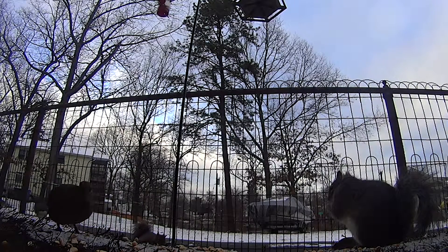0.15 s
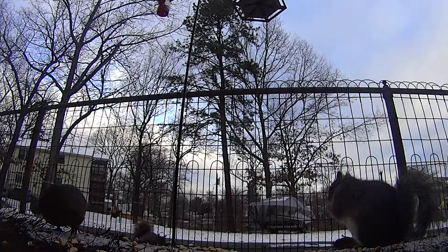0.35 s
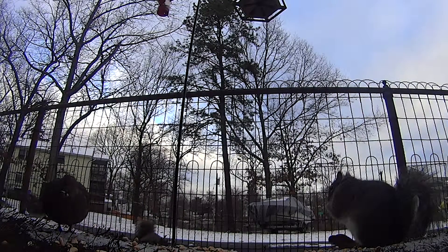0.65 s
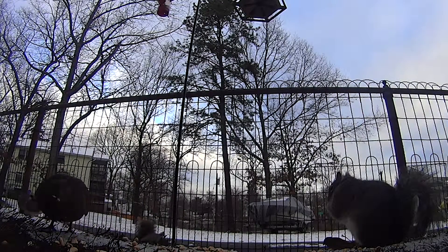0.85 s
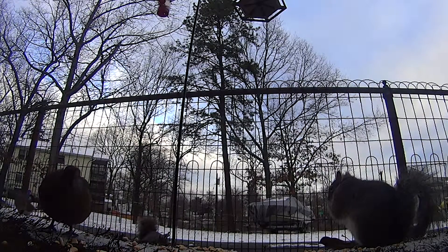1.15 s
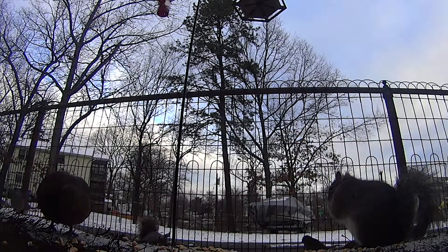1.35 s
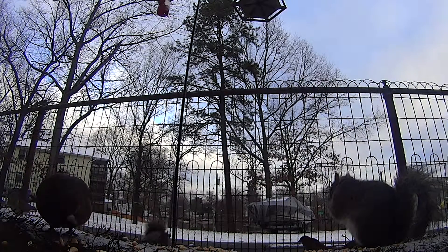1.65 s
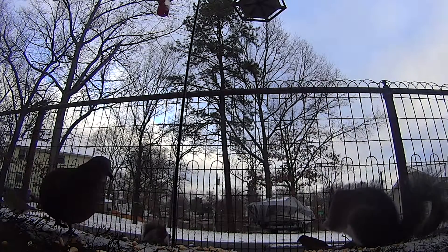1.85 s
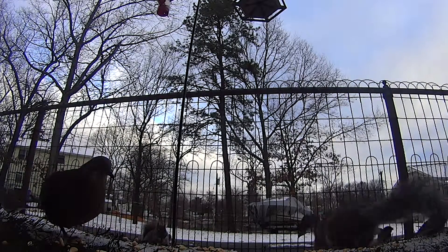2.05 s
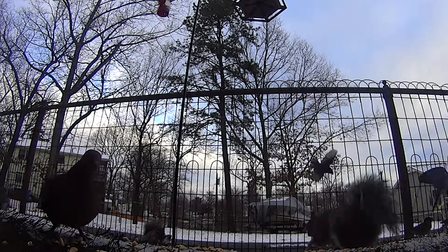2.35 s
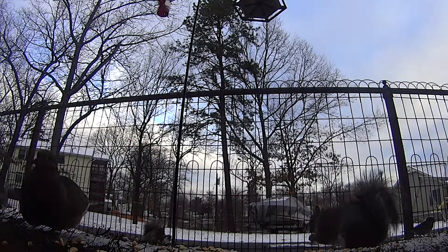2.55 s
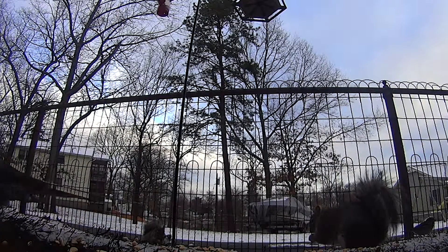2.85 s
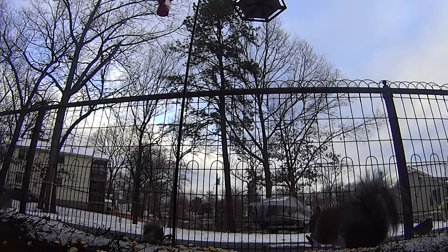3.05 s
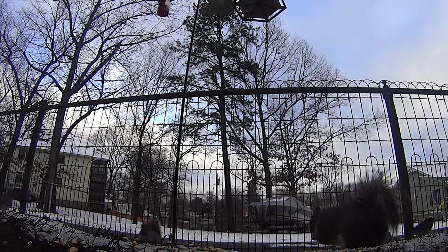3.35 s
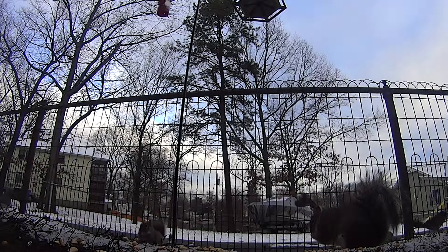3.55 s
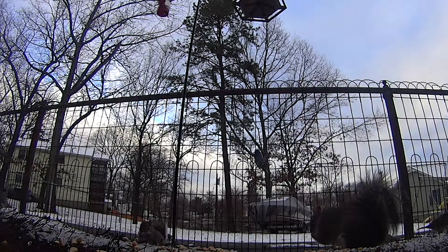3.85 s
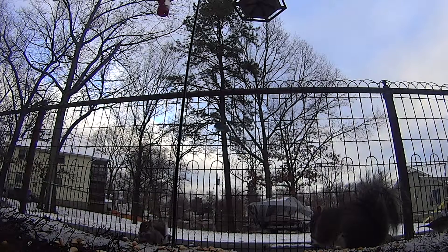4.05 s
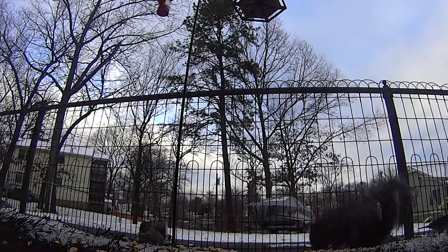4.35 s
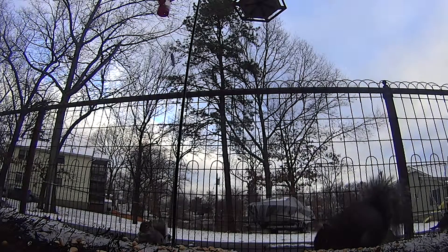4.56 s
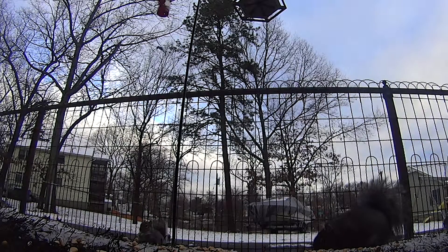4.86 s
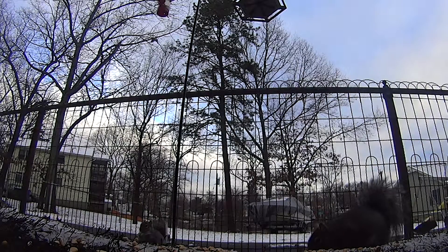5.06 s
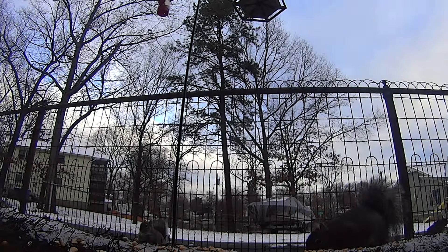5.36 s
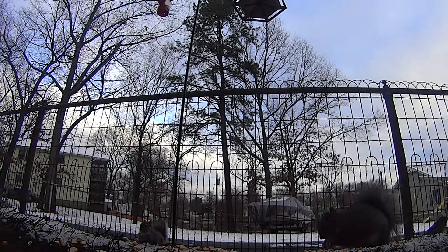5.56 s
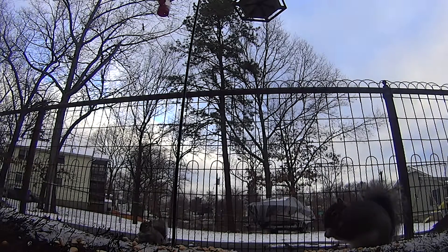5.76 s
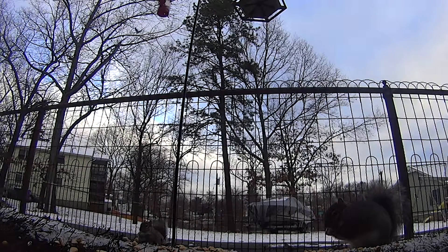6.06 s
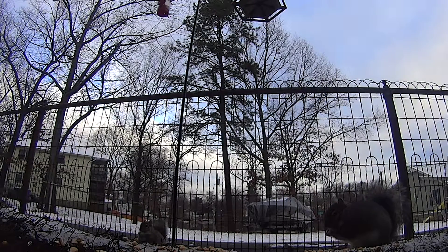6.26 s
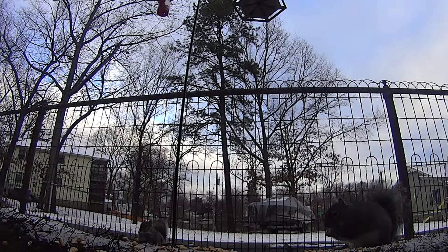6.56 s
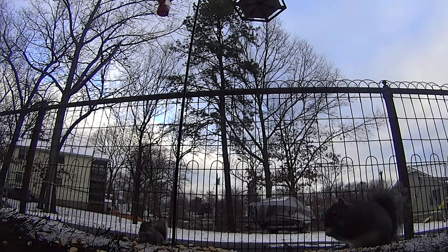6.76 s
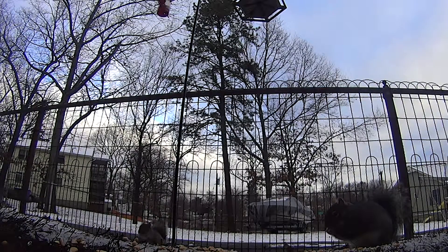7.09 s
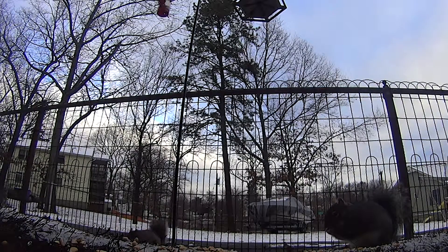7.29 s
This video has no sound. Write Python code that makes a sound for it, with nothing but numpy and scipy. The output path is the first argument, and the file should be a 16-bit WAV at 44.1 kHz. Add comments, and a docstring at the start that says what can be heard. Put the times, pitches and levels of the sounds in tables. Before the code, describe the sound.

A squirrel feeds in scattered husks right beside a small camera in a quiet yard. Dry clicks and light paw patter come first, then dull steps on the hollow platform and doves taking off with quick, airy, squeaky wing whistles. A violent rattling bump on the plastic housing peaks near four seconds, followed by receding wingbeats, calm nibbling and occasional soft taps over steady wide hiss.

```python
"""A feeding platform outdoors: a small camera stands in scattered seed while a squirrel forages around it.
Under everything lie faint air, wide hiss and a thin whine; random pushes ring the housing as husk ticks and scrapes.
Feet sound the platform's low modes, and sharp knocks ring the housing's upper modes with a short rattle.
Doves fly off: each wingbeat is a short whistle with an arched pitch and a diffuse echo."""
import sys
import numpy as np
from scipy import signal
from scipy.fft import rfft, irfft
from scipy.io import wavfile
from scipy.ndimage import uniform_filter1d

SR = 44100
rng = np.random.default_rng(int(sys.argv[2]) if len(sys.argv) > 2 else 0)


def digitize_waveform(pressure):
    """Quantize a signal to 16-bit integers and store it at the path in sys.argv[1].

    Rows of a 2-D input are taken as channels; values are limited to [-1, 1].
    """
    field = np.atleast_2d(pressure).T
    bounded = np.clip(field, -1, 1)
    quanta = np.round(bounded * 32767).astype(np.int16)
    wavfile.write(sys.argv[1], SR, quanta)


N = 327507


def undb(db):
    """Decibels to gain."""
    return 10 ** (np.asarray(db) / 20)


def level(x, db):
    """Scale to an rms level."""
    return x * undb(db) / np.sqrt(np.mean(x ** 2) + 1e-24)


def add(out, start_s, x):
    """Mix a stereo or mono sound in at a time."""
    i = max(int(start_s * SR), 0)
    out[:, i:i + x.shape[-1]] += x[..., :max(N - i, 0)]


def shaped_noise(points):
    """Steady noise whose spectrum follows (pitch_hz, level_db) points."""
    hz, db = np.transpose(points)
    f = np.maximum(np.fft.rfftfreq(N, 1 / SR), 1)
    gain = undb(np.interp(np.log(f), np.log(hz), db))
    return irfft(rfft(rng.standard_normal(N)) * gain, N)


def resonance(f, hz, width_hz):
    """Complex response of one resonance, 1 at its centre."""
    return 1j * f * width_hz / (hz ** 2 - f ** 2 + 1j * f * width_hz)


def band(hz, width_hz):
    """Noise passed twice through one resonance."""
    f = np.fft.rfftfreq(N, 1 / SR)
    return irfft(rfft(rng.standard_normal(N)) * resonance(f, hz, width_hz) ** 2, N)


def drift(steps_per_s, step_db):
    """Gain that wanders smoothly: random steps in dB, averaged over one step's length."""
    k = int(SR / steps_per_s)
    steps = np.repeat(rng.standard_normal(N // k + 1), k)
    return undb(step_db * uniform_filter1d(steps, k)[:N])


def burst(t60_s):
    """Stereo noise that dies away, scaled to unit energy in the left port."""
    t = np.arange(int(t60_s * SR)) / SR
    x = rng.standard_normal((2, len(t))) * np.exp(-np.log(1000) * t / t60_s)
    return x / np.sqrt(np.sum(x[0] ** 2))


def ring(modes, treble_db=0, length=1, pitch=1):
    """Stereo response of a body to one blow: decaying modes, with treble_db tilting the upper ones."""
    hz, db, t60_s, lead_rad = np.transpose(modes)[:, :, None]
    t = np.arange(int(t60_s.max() * length * SR)) / SR
    upper = np.clip(np.log2(hz / 1800), 0, .5) * 2  # 0 up to 1800 Hz, 1 from half an octave above
    decay = undb(db + treble_db * upper) * np.exp(-np.log(1000) * t / (t60_s * length))
    polarity = (-1) ** np.arange(len(modes))[:, None]  # neighbouring modes swing against each other
    swing = 2 * np.pi * hz * pitch * t
    ports = [np.sum(polarity * decay * np.cos(swing + side * lead_rad), axis=0) for side in (.5, -.5)]
    return np.array(ports)


def grains(size, per_s, spread_db):
    """Sparse random pushes of uneven strength and either sign."""
    chance, strength = rng.random(size), rng.standard_normal(size)
    sign = rng.choice([-1, 1], size)
    return (chance < per_s / SR) * sign * undb(spread_db * np.clip(strength, -2, 2))


def excite(pushes, response):
    """Play a train of pushes through a stereo response."""
    return signal.fftconvolve(pushes[None], response, axes=1)


# Spectrum of the air, alike in both ports: pitch_hz [Hz], level_db [relative dB per Hz]
AIR_SPECTRUM = [(15, -53.5), (25, -16), (48, 1.5), (81, -4), (107, 0), (156, -1), (223, -3), (296, -3.5),
                (327, -6.5), (480, -9), (1170, -13), (1630, -12.5), (2450, -15.5), (6780, -17.5),
                (11000, -19.5), (14300, -107), (22000, -120)]
# Spectrum of the hiss, opposed between the ports: pitch_hz [Hz], level_db [relative dB per Hz]
HISS_SPECTRUM = [(15, -51.5), (25, -20), (92, -16.5), (192, -9), (296, -1.5), (327, -16), (372, 0.5),
                 (412, -8), (635, -4.5), (1430, -8.5), (5820, -19), (6610, -21), (11000, -27), (14300, -75),
                 (22000, -120)]


def background(air_db=-60.5, hollow_db=-72, hiss_db=-59, whine_db=-82):
    """Outdoor air hums in the housing; the close ports add wide hiss and a thin electronic whine."""
    air = level(shaped_noise(AIR_SPECTRUM), air_db) * drift(4.07, step_db=.168)
    hollow = level(band(1607, 300), hollow_db) * drift(5.3, step_db=.1656)
    hiss = level(shaped_noise(HISS_SPECTRUM), hiss_db)
    whine = np.array([level(band(6750, 110), whine_db) for port in range(2)])
    return air + hollow + hiss * np.array([[1], [-1]]) + whine


# Modes of the platform: pitch_hz [Hz], level_db [dB], t60_s [s], left_lead_rad [rad]
PLATFORM_MODES = [(124, -18, 0.13, -0.37), (205, -17.5, 0.1416, -1.04), (313, 6, 0.057, -2),
                  (424, 2.5, 0.0091, -2.5), (610, -14, 0.03, -4.5), (641.2, -1, 0.037, -2.5)]


def footfall(pitch, contact_s=0.0014, softening=4, length=1.55, linger=1.83):
    """A smooth push on the platform: softer, lower-pitched steps push for longer and ring on."""
    push = signal.windows.hann(max(int(SR * contact_s / pitch ** softening), 5))
    return excite(push / push.sum(), ring(PLATFORM_MODES, length=length / pitch ** linger, pitch=pitch))


# Modes of the camera housing: pitch_hz [Hz], level_db [dB], t60_s [s], left_lead_rad [rad]
HOUSING_MODES = [(1572, 6, 0.015, 1.65), (1685, 7, 0.015, 1.81), (2620, -7, 0.0093, 2),
                 (2990, -11.5, 0.016, 4), (3650, -6.5, 0.01, 2.5), (4200, -4, 0.018, 3.5),
                 (4900, -11.5, 0.023, 2), (5220, -5, 0.0058, 4.5), (5470, -14, 0.0035, 2.5),
                 (5915, -6, 0.0057, -0.5), (7230, -16.5, 0.014, 1), (8880, -18.5, 0.0099, 2),
                 (9550, -21.5, 0.0068, -1), (10750, -28, 0.0045, 3.5)]
# How busy the animals are in the seed: time_s [s], swell_db [dB above calm feeding]
BUSTLE_CURVE = [(0, -0.5), (1.95, -2), (2.2, 11.5), (2.6, 10.5), (3.1, 0), (3.65, 3.5), (4.05, 18.5),
                (4.3, 8), (4.48, 8.5), (4.75, 1.5), (6.1, -2), (6.45, 5), (6.9, -7)]


def foraging(tick_db=-71, patter_db=-70, rustle_db=-73, tick_share=0.76, patter_share=0.62):
    """Nibbling ticks, shifting paws and rustling husks: random pushes that swell with the bustle."""
    bustle_db = np.interp(np.arange(N) / SR, *np.transpose(BUSTLE_CURVE))
    nibbles = grains(N, per_s=30, spread_db=5)
    paws = grains(N, per_s=20, spread_db=4)
    husks = grains(N, per_s=900, spread_db=6.5)
    ticks = excite(nibbles, ring(HOUSING_MODES, treble_db=-18))[:, :N]
    patter = excite(paws, footfall(pitch=.92))[:, :N]
    rustle = excite(husks, ring(HOUSING_MODES, treble_db=-5, length=0.39))[:, :N]
    # levels are set at calm; ticks and patter follow only a share of the swell
    ticks = level(ticks, tick_db) * undb(tick_share * bustle_db)
    patter = level(patter, patter_db) * undb(patter_share * bustle_db)
    return ticks + patter + level(rustle, rustle_db) * undb(bustle_db)


# Claws and feathers dragged through seed: start_s [s], length_s [s], level_db [dB rms], treble_db [dB]
SCRAPE_EVENTS = [(2.097, 0.1044, -56, -10.5), (2.733, 0.069, -63.5, -5), (3.2, 0.0152, -51, 0),
                 (3.235, 0.04, -44.5, -3.5), (3.27, 0.014, -51, -12), (3.76, 0.14, -62, -9),
                 (3.929, 0.014, -44, -11), (3.936, 0.023, -35.5, -0.5), (3.97, 0.028, -38, -9.5),
                 (3.99, 0.051, -50.5, -3), (4.387, 0.11, -63.5, 0)]


def scrapes(per_s=2500, spread_db=6, length=0.31):
    """Dense catches of claw and husk ring the housing."""
    out = np.zeros((2, N))
    for start_s, length_s, level_db, treble_db in SCRAPE_EVENTS:
        size = int(length_s * SR)
        catches = grains(size, per_s, spread_db) * signal.windows.tukey(size, .5)
        add(out, start_s, level(excite(catches, ring(HOUSING_MODES, treble_db, length)), level_db))
    return out


# Bursts of flapping: first_stroke_s [s], last_stroke_s [s], strokes [count], stroke_length_s [s],
# first_pitch_hz [Hz], last_pitch_hz [Hz], first_level_db [dB], last_level_db [dB],
# fall [share of the pitch lost by the end of a stroke]
FLAP_BURSTS = [(2.184, 2.356, 3, 0.027, 2129, 2140, -57, -52, 0.388),
               (2.651, 2.851, 3, 0.029, 2160, 2006, -57, -61, .15),
               (3.218, 3.322, 2, 0.03, 1840, 1750, -54, -43.5, 0.11),
               (3.37, 3.891, 8, .033, 2260, 2400, -68.5, -64.5, 0.11),
               (3.502, 3.605, 2, .024, 1707, 1733, -55, -52.5, 0.12),
               (3.686, 3.854, 3, .035, 1850, 1910, -53, -58.5, 0.16),
               (4.049, 4.21, 3, 0.041, 2440, 2410, -58.5, -60, .33),
               (4.298, 4.67, 5, .042, 2305, 2317, -61, -61.5, 0.155),
               (4.358, 4.448, 2, .019, 1760, 1840, -62, -54.5, .1),
               (4.802, 4.903, 2, .038, 2196, 2190, -63.5, -62, .13),
               (5.034, 5.122, 2, .038, 2250, 2345, -64.5, -62.5, 0.103),
               (5.242, 5.748, 4, 0.0328, 2050, 2060, -64.5, -72.5, .11),
               (6.333, 6.513, 3, 0.02, 2035, 2260, -66, -66, 0.087),
               (6.857, 6.965, 2, .026, 2127, 2092, -67, -72, .08)]


def wingbeats(tiring=.06, uneven_db=0.5, uneven_pitch=0.0046):
    """Strokes as (crest_s, length_s, top_hz, level_db, fall): the beat slows while pitch and level glide."""
    for first_s, last_s, strokes, length_s, first_hz, last_hz, first_db, last_db, fall in FLAP_BURSTS:
        for along in np.linspace(0, 1, round(strokes)):
            effort = rng.standard_normal()  # a harder stroke is both higher and louder
            # gaps begin shorter than the burst's mean by the tiring share, and end longer by it
            crest_s = first_s + (last_s - first_s) * along * (1 - tiring * (1 - along))
            top_hz = (first_hz + (last_hz - first_hz) * along) * (1 + uneven_pitch * effort)
            level_db = first_db + (last_db - first_db) * along + uneven_db * effort
            yield crest_s, length_s, top_hz, level_db, fall


def wings(crest=0.3, housing_db=6, lead_rad=0.48, edge=0.38, overtone_db=-12, echo_db=-6, echo_s=0.18, far_db=-54):
    """Flight feathers whistle on each stroke: the pitch rises with wing speed, then falls away."""
    flutter, rough = .02, .3  # rms shares of pitch and of loudness
    out, spread = np.zeros((2, N)), np.zeros((1, N))
    sides = np.array([[.5], [-.5]])
    for crest_s, length_s, top_hz, level_db, fall in wingbeats():
        size = int(length_s * SR)
        start_s = crest_s - crest * length_s
        stroke = np.linspace(0, 1, size)
        waver, shake = (level(uniform_filter1d(rng.standard_normal(size), size=90), 0) for _ in range(2))
        arch = 1 - fall * ((stroke - crest) / (1 - crest)) ** 2
        hz = top_hz * arch * (1 + flutter * waver)
        # the whistle and its octave swell as they glide through resonances of the housing
        swell = signal.windows.tukey(size, edge) * (1 + undb(housing_db) * abs(resonance(hz, 1750, 250)))
        phase = 2 * np.pi * np.cumsum(hz) / SR
        overtone = undb(overtone_db) * abs(resonance(2 * hz, 4700, 500)) ** 2 * np.sin(2 * phase)
        whistle = swell * (1 + rough * shake) * (np.sin(phase + lead_rad * sides) + overtone)
        add(out, start_s, level(whistle, level_db))
        # a close bird is louder at the ports, but fills the yard no more than a far one
        add(spread, start_s, level(whistle[0], min(level_db, far_db)))
    return out + undb(echo_db) * excite(spread[0], burst(echo_s))[:, :N]


# Footfalls and hops on the platform: start_s [s], level_db [relative dB], pitch [factor]
FOOTSTEPS = [(2.013, -49, 0.85), (2.126, -48, 0.914), (2.149, -45.5, 1.042), (2.186, -39, 1.013),
             (2.457, -52, 0.91), (2.744, -46.5, 1.06), (2.798, -46, .98), (3.059, -44, 0.965),
             (3.208, -38.5, 1.12), (3.272, -39, 1.03), (3.339, -46.5, 0.94), (3.935, -39, .95),
             (3.998, -41.5, .9), (4.025, -45.5, 1.17), (4.527, -54, .84), (5.014, -50.5, .94),
             (5.208, -44.5, 0.908), (6.327, -39.5, .85), (6.620, -49.5, 0.896), (6.648, -48, 0.82),
             (7.197, -49, 0.87)]


def thuds(gain_db=2, load_s=0.00299, crunch_db=-21, crunch_s=0.038):
    """Steps and hops crunch the seed and sound the platform's low modes."""
    out = np.zeros((2, N))
    size = int(crunch_s * SR)
    for start_s, level_db, pitch in FOOTSTEPS:
        # the platform starts to give while the foot is still loading it
        add(out, start_s - load_s, undb(level_db + gain_db) * footfall(pitch))
        # the toes meet the husks just before the weight comes down
        husks = grains(size, per_s=900, spread_db=3) * signal.windows.hann(size)
        crunch = excite(husks, ring(HOUSING_MODES, treble_db=-9, length=0.192))
        add(out, start_s - crunch_s / 4, level(crunch, level_db + crunch_db))
    return out


# A body's whole weight lands: start_s [s], level_db [relative dB]
JOLT_EVENTS = [(2.178, -52), (3.256, -43.5), (3.942, -53), (3.969, -46), (3.991, -45)]
# Modes of the stand under the platform: pitch_hz [Hz], level_db [dB], t60_s [s], left_lead_rad [rad]
STAND_MODES = [(52, -3.5, 0.174, -.1), (84.3, 4.5, 0.11, -.2), (121.2, 6, .1, -.5), (174.3, 0.5, 0.051, -1)]


def jolts(gain_db=-2):
    """The heaviest landings rock the stand, which rings at its low modes."""
    out = np.zeros((2, N))
    for start_s, level_db in JOLT_EVENTS:
        add(out, start_s, undb(level_db + gain_db) * ring(STAND_MODES))
    return out


def glancing(level_db, firm_db=-25):
    """How many dB a knock falls short of a firm contact."""
    return max(firm_db - level_db, 0)


# Sharp contacts on or beside the housing: start_s [s], level_db [relative dB], ring_length [factor]
KNOCK_EVENTS = [(.888, -41.5, 1.1), (.931, -47, .96), (1.712, -44, 0.7), (2.741, -31, 0.44),
                (3.2442, -27.5, 0.515), (3.2547, -28, 0.45), (3.267, -31.5, 0.716), (3.91, -44, 1.1),
                (3.9444, -23, 0.69), (3.949, -16, 0.55), (3.9670, -6.5, 0.79), (3.9782, -12, 1.44),
                (4.092, -36, 0.55), (6.324, -38, 0.52), (6.408, -47, 0.91), (6.586, -44, 0.71),
                (6.651, -47, .6)]


def recoil(firm_db=-35, lightening=1.64, load_s=0.00292):
    """The weight behind each knock also sounds the platform, less so for a glancing one."""
    out = np.zeros((2, N))
    for start_s, level_db, _ in KNOCK_EVENTS:
        weight_db = firm_db - lightening * glancing(level_db)
        add(out, start_s - load_s, undb(weight_db) * footfall(pitch=1.0))
    return out


def knocks(rattle_db=-29, rattle_s=0.14, rattle_treble_db=-3, dulling=1.33):
    """Single hard contacts ring the housing for a few milliseconds and set the seed around it rattling."""
    out = np.zeros((2, N))
    for start_s, level_db, length in KNOCK_EVENTS:
        treble_db = -dulling * glancing(level_db)  # glancing knocks are duller
        add(out, start_s, undb(level_db) * ring(HOUSING_MODES, treble_db, length))
        rattle = excite(burst(rattle_s)[0], ring(HOUSING_MODES, treble_db + rattle_treble_db, length=0.55))
        add(out, start_s, undb(level_db + rattle_db) * rattle)
    return out


def scene():
    """Everything that reaches the two ports."""
    return background() + foraging() + scrapes() + wings() + thuds() + jolts() + recoil() + knocks()


def record(dry):
    """The camera cuts the top steeply above 11050 Hz."""
    return signal.sosfilt(signal.ellip(10, .2, 70, 11050, fs=SR, output="sos"), dry)


dry = scene()
out = record(dry)
digitize_waveform(out)
```